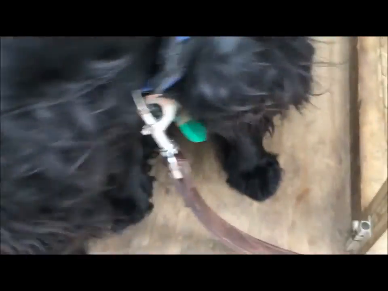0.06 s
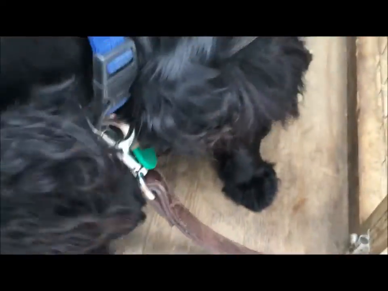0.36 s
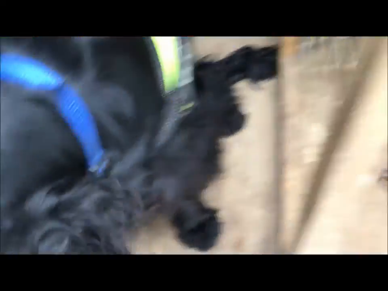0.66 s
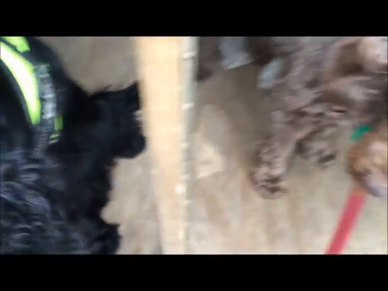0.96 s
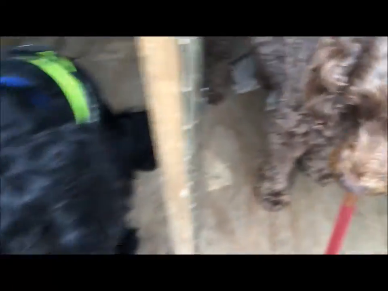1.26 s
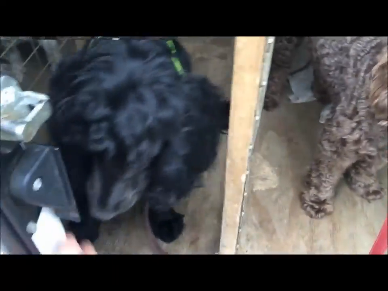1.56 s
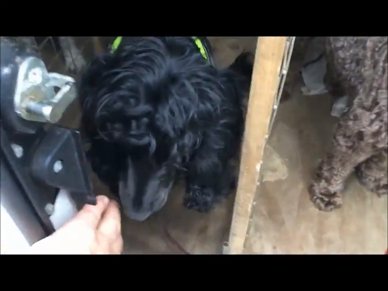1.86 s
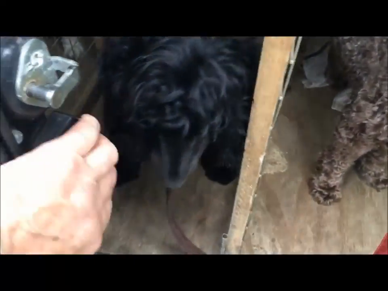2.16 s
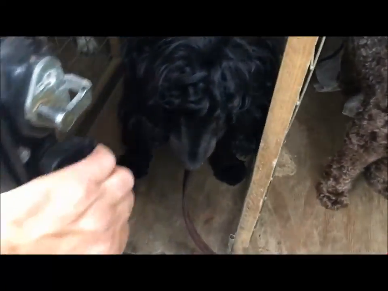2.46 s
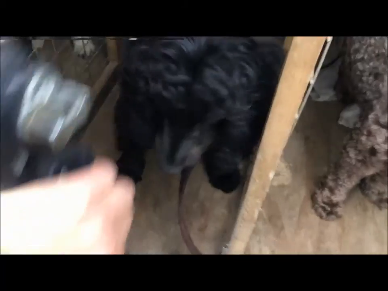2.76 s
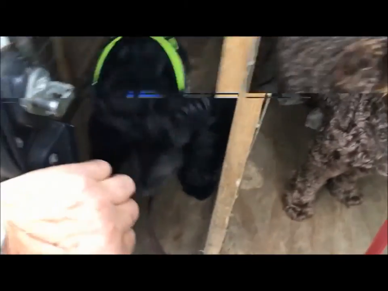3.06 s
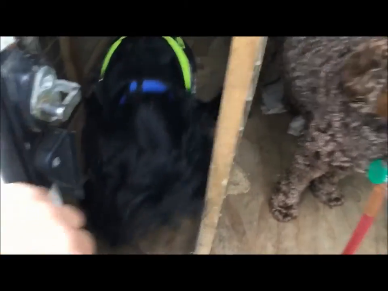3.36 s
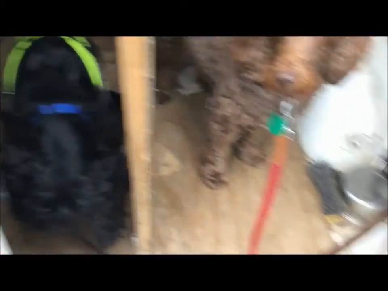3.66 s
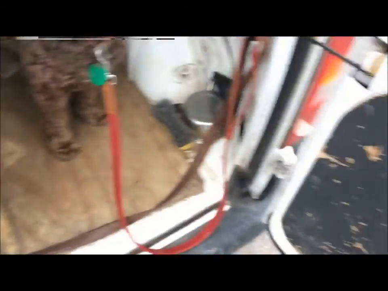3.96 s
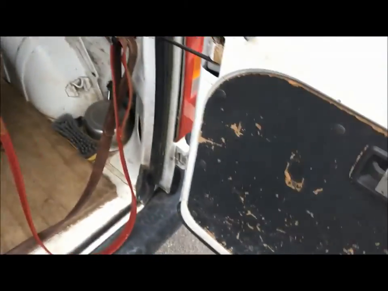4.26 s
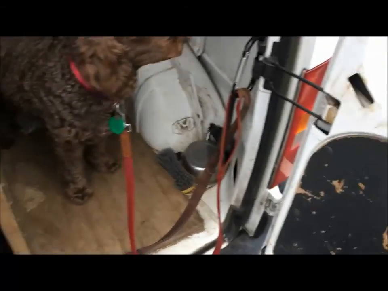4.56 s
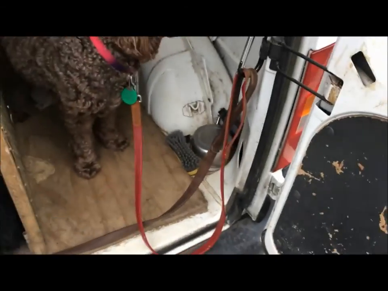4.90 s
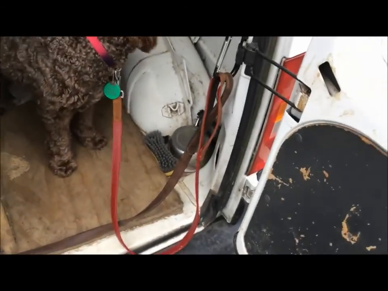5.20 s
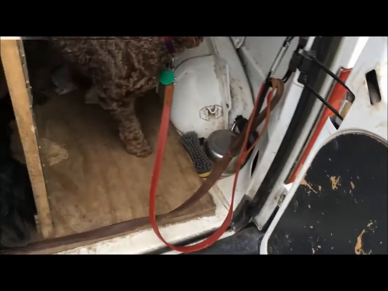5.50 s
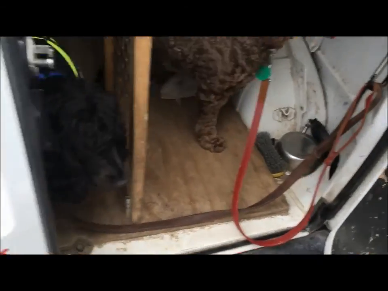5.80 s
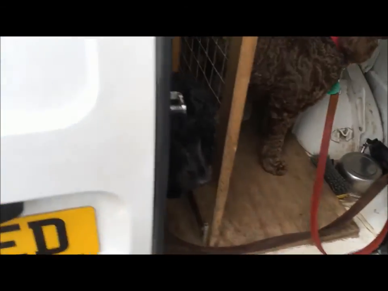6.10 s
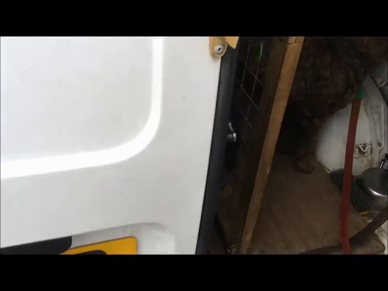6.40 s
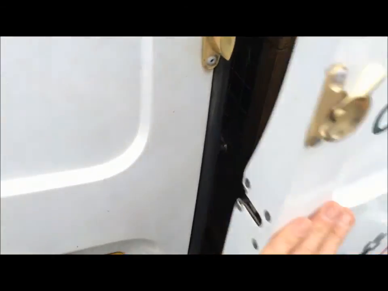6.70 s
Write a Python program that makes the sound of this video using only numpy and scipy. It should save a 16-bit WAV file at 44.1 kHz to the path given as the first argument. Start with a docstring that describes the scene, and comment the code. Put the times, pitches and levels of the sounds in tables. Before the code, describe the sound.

Metal van door knocks, slams and clacks outdoors, with wind gusts, light paw scuffs in a crate and distant chirping.

```python
"""A van's rear door knocks, clunks shut and later gives a sharp clack: steel hits steel at the catch,
and the door's weight shakes its panel and makes the air in the load space boom. Gusts of wind swirl
against the microphone. Two dogs scuff and tick their paws in a creaking wooden crate, and a collar tag
tinkles. Small birds chirp far off, over distant traffic and a soft hiss."""
import sys
import numpy as np
from scipy import signal
from scipy.fft import rfft, irfft, next_fast_len
from scipy.io import wavfile
from scipy.ndimage import uniform_filter1d

SR = 44100
rng = np.random.default_rng(int(sys.argv[2]) if len(sys.argv) > 2 else 0)


def wrap_up_sound(samples):
    """Save the sound to the file named by the first command line argument, as 16-bit audio."""
    columns = np.atleast_2d(samples).T
    # keep every value between -1 and 1, then stretch to whole-number steps
    tamed = np.clip(columns, -1, 1)
    steps = np.round(tamed * 32767).astype(np.int16)
    wavfile.write(sys.argv[1], SR, steps)


N = 306274
T = np.arange(N) / SR

# Steel hitting steel. The ring factor is high when the catch is loose, low when it is pressed home.
# (time [s], clack level [dB], high click level [dB], ring factor [x])
CATCH_HITS = [(1.573, -23.5, -26, 1.02), (1.578, -21, -38, 1.03), (1.592, -19.5, -31, 0.95),
              (2.469, -24.5, -33.5, 1.59), (2.495, -28.5, -24.5, 0.57), (2.944, -21.5, -41, 0.65),
              (2.957, -24, -16.5, 1.4), (2.969, -13.5, -21, 1.03), (3.069, -25, -28, 0.86),
              (5.5354, -12.5, -8.5, .7), (5.54, -15, -25, 0.82), (5.618, -34, -37, 0.86)]
# The catch's own tones. Ring time is how long a tone takes to fade by 60 dB.
# (pitch [Hz], level [dB], free ring time [s])
CATCH_TONES = [(1870, -1, 0.25), (2066, -9, 0.76), (2010, 0, 0.31), (2200, -20, 0.086), (2610, 18, 0.038),
               (3000, 6, 0.016), (3340, -19, .1), (3600, -10, 0.11), (3830, -14, 0.09), (3750, -12, 0.096),
               (5550, -11, 0.086), (6690, -4, 0.11)]


def door_catch(ring_db=-18.5, jolt_db=-12):
    """Each hit makes the steel clatter, rings the catch and jolts the door panel."""
    out = np.zeros(N)
    for s, clack_db, click_db, length in CATCH_HITS:
        add(out, s, clatter(clack_db, click_db, length))
        tones = ring(CATCH_TONES, rise_s=0.00058, scatter_db=4, detune=0.0027, length=0.44 * length ** 2)
        add(out, s, length * undb(clack_db + ring_db) * tones)
        add(out, s, undb(clack_db + jolt_db) * door_panel(centre_hz=550))
    return out


# The door landing on its frame: (time [s], panel level [dB], panel centre pitch [Hz], boom level [dB])
DOOR_THUDS = [(1.578, -18.5, 255, -30), (1.612, -18.5, 189, -17), (1.657, -33, 199, -16.5),
              (2.478, -33, 420, -38), (2.967, -10, 170, -7), (2.971, -22.5, 600, -30),
              (2.984, -9.5, 150, -29), (5.54, -10, 221, -44), (5.57, -32, 126, -26)]
# Deep tones of the air in the load space, with a long low wobble of the door near 54 Hz: (pitch [Hz], level
# [dB], free ring time [s])
BOOM_TONES = [(52.3, 7.5, 0.2), (54.3, -7.5, 2.4), (65, -16, 2.2), (68.83, -16, 1.67), (92, -1.5, 0.85),
              (112, -3.5, 0.34)]


def door_thuds():
    """The door's weight shakes its panel and pushes on the air inside, which booms."""
    out = np.zeros(N)
    for s, panel_db, centre_hz, boom_db in DOOR_THUDS:
        add(out, s, undb(panel_db) * door_panel(centre_hz))
        boom = ring(BOOM_TONES, rise_s=0.0032, scatter_db=3.5, detune=0, length=0.66)
        add(out, s, undb(boom_db) * boom)
    return out


# Tones of the door's thin metal sheet: (pitch [Hz], level [dB], ring time [s])
PANEL_TONES = [(109, -21, 1), (117, -4.5, 0.37), (178.4, 5.5, 0.099), (200.3, -11, 0.62), (255, -2.5, 0.13),
               (268.7, 3, 0.152), (306, -10.5, 0.41), (355.7, -11, 0.16), (502, -11.5, 0.18),
               (577, -6.5, 0.2), (712, -0.5, 0.1), (771, -11, 0.26), (844, -16.5, 0.21), (1048, -18, 0.42),
               (1257, 7, 0.11), (1307, -10, 0.17), (1580, -8.5, 0.21)]


def door_panel(centre_hz, slope_db=5, rumble_db=-15):
    """One blow rings the tones near centre_hz (low if soft, high if hard); the bodywork rumbles on."""
    tones = [(hz, db - slope_db * abs(np.log2(hz / centre_hz)), t60) for hz, db, t60 in PANEL_TONES]
    out = ring(tones, rise_s=0.0022, scatter_db=0.5, detune=0.0065)
    t = T[:2 ** 15]
    rumble = noise(lambda f: above(f, 89, order=2) * np.exp(-f / 150), len(t))
    rise = 1 - np.exp(-t / 0.0055)
    add(out, 0, undb(rumble_db) * rumble * rise * fade(t, t60=0.83))
    return out


# How strong the steel's many crowded tones are: (pitch [Hz], level [dB per Hz])
STEEL_LEVELS = [(88, -29), (150, -3), (280, -10.5), (545, -19), (888, -20.5), (1100, -15), (1290, -19.5),
                (1690, -25), (1830, -19), (1980, -20.5), (4950, -25), (5460, -30.5), (7470, -30.5),
                (15100, -27.5), (16000, -39)]
# How long they last: (pitch [Hz], free ring time [s])
STEEL_RING_TIMES = [(150, 0.54), (500, 0.27), (1500, 0.17), (3500, 0.13), (7000, 0.12), (15000, 0.086)]


def clatter(clack_db, click_db, length, contact_s=0.0004, split_hz=4600, build_cycles=0.32):
    """Many steel tones at once: the highs start fast and die first, the lows build up and linger."""
    t = T[:2 ** 14]
    centres = np.geomspace(160, 15000, 14)
    half_band = np.sqrt(centres[1] / centres[0])
    weights = undb(at_hz(STEEL_LEVELS, centres)) * np.sqrt(centres) * above(centres, 240, order=2)
    high = above(centres, split_hz, order=3)
    low = np.sqrt(1 - high ** 2)
    clack = undb(clack_db) * low / np.linalg.norm(weights * low)
    click = undb(click_db) * high / np.linalg.norm(weights * high)
    f = np.fft.rfftfreq(len(t), 1 / SR) + 1
    spectrum = rfft(rng.standard_normal(len(t))) * van_body(f)
    out = np.zeros(len(t))
    for hz, gain in zip(centres, np.hypot(clack, click) * weights):
        band = unit(irfft(spectrum * ((f >= hz / half_band) & (f < hz * half_band))))
        rise = 1 - np.exp(-t / (contact_s + build_cycles / hz))
        t60 = length * at_hz(STEEL_RING_TIMES, hz)
        decay = fade(t, t60) + undb(-29) * fade(t, t60 * 2.8)  # a quick fade, then a faint tail
        out += gain * band * rise * decay
    return out


BODY_RIPPLE = rng.standard_normal(1024)


def van_body(hz, ripple_db=3.5, spacing_hz=65):
    """The van boosts some pitches and weakens others, the same way every time."""
    return undb(ripple_db * np.interp(hz / spacing_hz, np.arange(len(BODY_RIPPLE)), BODY_RIPPLE))


# Single puffs of wind that stand out: (middle time [s], length [s], level [dB])
WIND_GUSTS = [(0.223, 0.043, -27.5), (.277, 0.011, -24), (0.521, 0.021, -22.5), (.566, 0.033, -22.5),
              (0.694, 0.03, -25), (.746, 0.014, -30), (1.356, 0.0088, -21), (1.434, 0.053, -26),
              (1.797, 0.013, -25), (1.937, 0.026, -26.5), (2.697, 0.066, -26), (2.844, 0.048, -25),
              (3.412, 0.011, -21.5), (4.011, 0.011, -8), (4.031, 0.0047, -5), (4.042, 0.016, -7.5),
              (4.113, 0.0059, -11), (4.167, 0.0059, -10.5), (4.2, 0.016, -11.5), (6.045, 0.02, -24),
              (6.439, 0.031, -17), (6.497, 0.045, -22), (6.555, .014, -14.5), (6.695, 0.015, -20.5),
              (6.78, 0.079, -29), (6.852, 0.016, -19.5)]


def gusts(calm_hz=91, rise_hz=1016, swing_gain=0.63):
    """Air swirls over the microphone's opening; the harder it blows, the brighter it sounds."""
    out = np.zeros(N)
    t = T[:2 ** 13] - T[2 ** 12]  # zero at the middle of the gust
    opening = lambda f: undb(3.5 * np.exp(-(np.log2(f / 625) / 0.28) ** 2))  # boost near 625 Hz
    for s, length, db in WIND_GUSTS + blast():
        hz = calm_hz + rise_hz * undb(db)
        swell = np.exp(-2 * (t / length) ** 2)
        swirl = swell * noise(lambda f: above(f, 52, order=2) * np.exp(-f / hz) * opening(f), len(t))
        # the core of the gust passes as one sharp swing of pressure
        phase = np.exp(2j * np.pi * rng.random())
        swing = np.real(phase / (1 + 2j * np.pi * hz * 1.29 * t))
        gust = swirl / np.linalg.norm(swirl) + swing_gain * swing / np.linalg.norm(swing)
        add(out, s + t[0], undb(db) * gust * np.linalg.norm(swell) / np.linalg.norm(gust))
    return out


# Strength of the one big blast of wind: (time [s], level [dB])
BLAST_LEVELS = [(3.895, -25.5), (3.94, -18), (3.985, -12), (4.022, -9.5), (4.07, -12), (4.095, -16),
                (4.16, -15.5), (4.215, -23.5), (4.25, -25)]


def blast(gap_s=0.016, length_s=0.012, spread_db=1.5):
    """List the big blast as a quick, uneven run of small gusts."""
    s, db = np.transpose(BLAST_LEVELS)
    times = np.arange(s[0], s[-1], gap_s)
    time_jitter, level_jitter = rng.standard_normal((256, 2))[:len(times)].T
    times += 0.1993 * gap_s * time_jitter
    levels = np.interp(times, s, db) + spread_db * level_jitter
    return [(time, length_s, level) for time, level in zip(times, levels)]


# Strength of the breeze between and under the gusts: (time [s], level [dB])
BREEZE_LEVELS = [(0, -36.5), (.62, -32), (.85, -45.5), (1.2, -46.5), (1.4, -29), (2.05, -41), (2.9, -40.5),
                 (3.3, -30.5), (3.85, -40.5), (4.07, -20.5), (4.3, -37.5), (4.65, -32), (4.9, -44.5),
                 (5.15, -28), (5.45, -39), (5.8, -36), (6.3, -42.5), (6.48, -31), (6.62, -39), (6.94, -33)]


def breeze(flutter_db=3.8):
    """Air drifting over the microphone makes a low, fluttering rumble."""
    s, db = np.transpose(BREEZE_LEVELS)
    rumble = noise(lambda f: above(f, 48) * np.exp(-f / 115), N)
    return rumble * undb(np.interp(T, s, db) + flutter_db * drift(28))


# Paws scuffing on plywood: (middle time [s], length [s], level [dB])
PAW_SCUFFS = [(.43, 0.14, -47.5), (1.844, 0.027, -46.5), (1.939, .03, -44), (4.98, 0.039, -38),
              (5.13, 0.019, -46), (5.344, 0.017, -33.5), (5.785, 0.021, -43), (6.791, .067, -47.5)]
# Leads and crate creaking: (middle time [s], length [s], level [dB])
CRATE_CREAKS = [(4.962, 0.039, -35.5), (5.138, 0.012, -38), (5.206, .062, -39.5), (5.74, 0.018, -46)]
# Light taps of claws, clips and crate mesh: (time [s], clack level [dB], high click level [dB])
CRATE_TICKS = [(0.0034, -30, -51), (0.401, -37, -49), (0.469, -45, -43.5), (0.571, -43, -68),
               (0.658, -65, -49.5), (1.1221, -38.5, -48), (2.0116, -41, -56), (2.0814, -69, -48),
               (3.268, -42, -44), (3.491, -40.5, -66), (4.9542, -36, -52), (5.2946, -36, -40.5),
               (5.3441, -32, -40)]


def dogs():
    """The dogs shift about, rubbing and tapping against their crate."""
    out = rubbing(PAW_SCUFFS, hz=2500, octaves=0.55) + rubbing(CRATE_CREAKS, hz=2280, octaves=0.22)
    for s, clack_db, click_db in CRATE_TICKS:
        add(out, s, clatter(clack_db, click_db, length=0.9, contact_s=0.00027))
    return out


def rubbing(events, hz, octaves):
    """Surfaces rub in grainy swells: a rasp around hz over the duller sound of the plywood."""
    swell = sum(undb(db) * np.exp(-2 * ((T - s) / length) ** 2) for s, length, db in events)
    rasp = lambda f: 1 / (1 + (np.log2(f / hz) / octaves) ** 2)
    wood = lambda f: 3.9 * np.sqrt(octaves) * above(530, f, order=2)
    rub = noise(lambda f: above(f, 450) * van_body(f) * (rasp(f) + wood(f)), N)
    grain = unit(undb(3.7 * drift(420)))
    return rub * swell * grain


# The tag swinging into its clip: (time [s], ring level [dB], ring factor [x])
TAG_HITS = [(0.439, -51, 0.22), (0.486, -47, 1.3), (.768, -49, .2), (.802, -50, 0.8), (.913, -49, 0.28),
            (1.438, -48, 1.1)]
# The tag's own tones: (pitch [Hz], level [dB], free ring time [s])
TAG_TONES = [(12690, -5, 0.27), (12760, 0, 0.12), (12860, 4, .1), (15070, 2, 0.18), (15000, 4, .07)]


def collar_tag(tick_db=-55):
    """The tag ticks against its clip, then rings freely or is hushed by fur."""
    out = np.zeros(N)
    for s, db, length in TAG_HITS:
        add(out, s, clatter(tick_db, tick_db, length=0.51))
        add(out, s, undb(db) * ring(TAG_TONES, rise_s=0.00089, scatter_db=1, detune=0.0028, length=length))
    return out


# Chirps that shoot up and level off: (time [s], level [dB])
RISING_CHIRPS = [(.24, -56.5), (.44, -48.5), (.755, -57), (2.831, -55), (3.716, -49), (3.897, -50),
                 (4.687, -46)]
# Notes that slide down: (time [s], length [s], starting pitch [Hz], level [dB])
FALLING_NOTES = [(0.824, 0.049, 3820, -54), (3.776, 0.084, 3580, -46), (4.709, 0.071, 4250, -45.5),
                 (6.267, 0.068, 3700, -47.5), (6.604, .05, 3700, -52), (6.726, 0.089, 4150, -45.5)]


def birds(pitch_drop=0.19, echo_db=-4.5):
    """Far-off birds whistle, blurred by a short echo from the surroundings."""
    out = np.zeros(N)
    for s, db in RISING_CHIRPS:
        add(out, s, undb(db) * whistle([3670, 4520, 4500, 4600], length_s=0.054))
    for s, length, hz, db in FALLING_NOTES:
        add(out, s, undb(db) * whistle([hz, hz * (1 - pitch_drop)], length))
    add(out, 1.191, undb(-46.5) * whistle([5740], length_s=0.03))  # one higher pip
    echo = rng.standard_normal(SR // 2) * fade(T[:SR // 2], t60=0.18)
    return out + undb(echo_db) * signal.fftconvolve(out, echo / np.linalg.norm(echo))[:N]


def whistle(pitches_hz, length_s):
    """One wavering bird note that glides through the given pitches."""
    size = int(length_s * SR)
    hz = np.interp(np.linspace(0, 1, size), np.linspace(0, 1, len(pitches_hz)), pitches_hz)
    hz *= 1 + 0.04 * drift(500)[:size]
    return np.sqrt(np.hanning(size)) * np.sin(2 * np.pi * np.cumsum(hz) / SR)


# The mix of lows and highs in the open air: (pitch [Hz], level [dB per Hz])
OUTDOOR_TONE = [(180, -25), (300, 7), (713, -10.5), (994, -9), (1810, -14.5), (3350, -17.5), (4910, -25),
                (5800, -22), (10400, -22), (11500, -20.5), (14700, -20.5), (16000, -24.5)]
# How loud the background is: (time [s], traffic level [dB], hiss level [dB])
OUTDOOR_LEVELS = [(0, -55, -65), (.5, -53, -61), (1.25, -53, -66), (1.95, -54, -60.5), (2.45, -50, -58.5),
                  (2.85, -51.5, -60), (4.15, -51, -62.5), (4.6, -47.5, -57), (5.3, -45, -56.5),
                  (6.2, -49.5, -60), (6.94, -48, -56.5)]


def outdoors(split_hz=6000):
    """Distant traffic below split_hz and a soft hiss above it, slowly swelling."""
    s, traffic_db, hiss_db = np.transpose(OUTDOOR_LEVELS)
    traffic = noise(lambda f: undb(at_hz(OUTDOOR_TONE, f)) * above(f, 580) * above(split_hz, f), N)
    hiss = noise(lambda f: undb(at_hz(OUTDOOR_TONE, f)) * above(f, split_hz), N)
    traffic *= undb(np.interp(T, s, traffic_db) + 0.8 * drift(21))
    hiss *= undb(np.interp(T, s, hiss_db) + 1.4 * drift(22))
    return traffic + hiss


def ring(tones, rise_s, scatter_db, detune, length=1):
    """One blow sets tones ringing, each a little different every time; length scales their ring times."""
    out = np.zeros(2 * SR)
    for hz, db, t60 in tones:
        level_jitter, pitch_jitter = rng.standard_normal(2)
        t = T[:int(np.clip(t60 * length, 0.01, 2) * SR)]
        wave = np.sin(2 * np.pi * hz * (1 + detune * pitch_jitter) * t)
        rise = 1 - np.exp(-t / rise_s)
        out[:len(t)] += undb(db + scatter_db * level_jitter) * wave * rise * fade(t, t60 * length)
    return out


def noise(gain, size):
    """Noise of average strength 1, with its lows and highs shaped by gain(Hz)."""
    fast = next_fast_len(size, real=True)
    hz = np.fft.rfftfreq(fast, 1 / SR) + 1
    return unit(irfft(gain(hz) * rfft(rng.standard_normal(fast)), fast)[:size])


def drift(rate):
    """A smooth random wobble that takes about rate steps a second."""
    step = int(SR / rate)
    steps = np.repeat(rng.standard_normal(N // step + 1), step)
    return unit(uniform_filter1d(steps, step)[:N])


def above(hz, edge_hz, order=4):
    """Let pitches above the edge through; swap hz and edge_hz to let those below through."""
    return 1 / np.sqrt(1 + (edge_hz / hz) ** (2 * order))


def at_hz(points, hz):
    """Read between the rows of a (pitch, value) table, with octaves evenly spaced."""
    f, value = np.transpose(points)
    return np.interp(np.log(hz + 1), np.log(f), value)


def fade(t, t60):
    """Die away by 60 dB in t60 seconds."""
    return np.exp(-np.log(1000) * t / t60)


def undb(db):
    """Turn decibels into a multiplier."""
    return 10 ** (np.asarray(db) / 20)


def unit(x):
    """Scale to an average strength (rms) of 1."""
    return x / np.sqrt(np.mean(x ** 2))


def add(out, s, x):
    """Mix x into out, starting at s seconds."""
    i = int(round(s * SR))
    a, b = max(i, 0), min(i + len(x), N)
    if b > a:
        out[a:b] += x[a - i:b - i]


def scene():
    """Everything as it reaches one microphone."""
    door = door_catch() + door_thuds()
    return (door + dogs() + collar_tag() + birds() + outdoors() + breeze() + gusts())[None]


def record(dry, bass_hz=33, top_hz=15950):
    """The phone drops the deepest bass, rounds the loudest peaks and cuts the highest treble."""
    dry = signal.sosfilt(signal.butter(2, bass_hz, "high", fs=SR, output="sos"), dry)
    rounded = dry / (1 + dry ** 6) ** (1 / 6)
    return signal.sosfilt(signal.ellip(10, 0.2, 70, top_hz, fs=SR, output="sos"), rounded)


dry = scene()
out = record(dry)
wrap_up_sound(out)
```